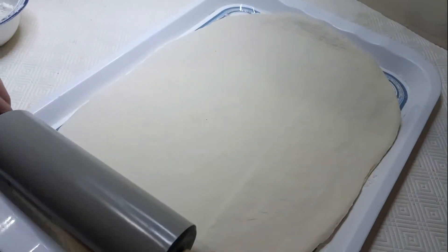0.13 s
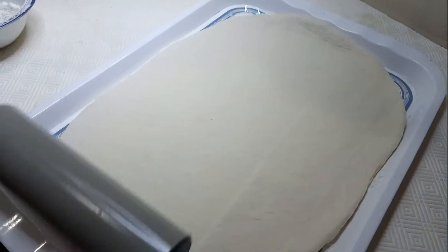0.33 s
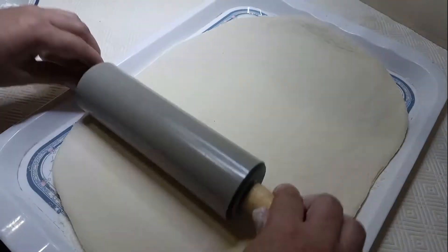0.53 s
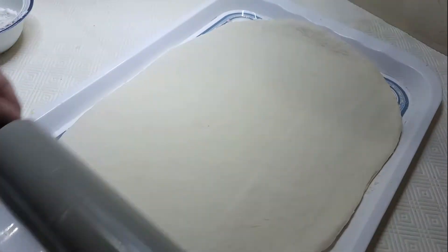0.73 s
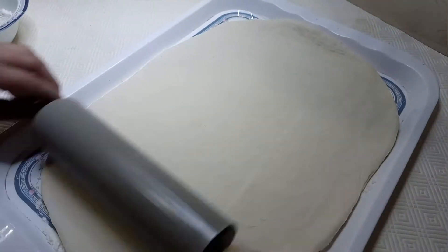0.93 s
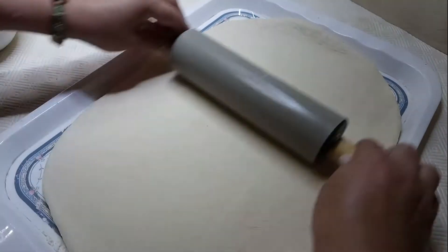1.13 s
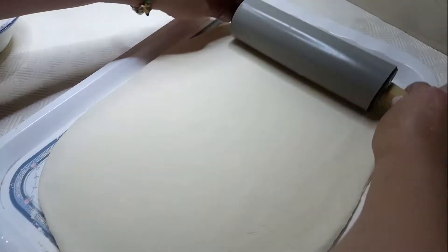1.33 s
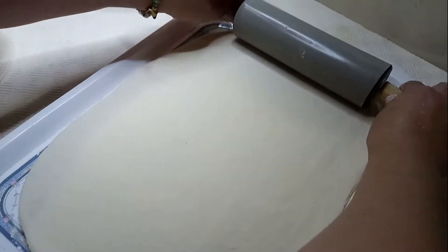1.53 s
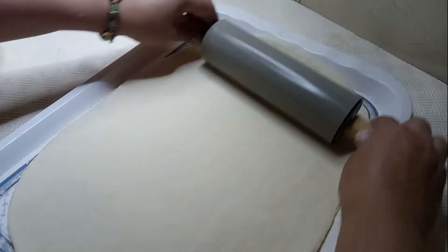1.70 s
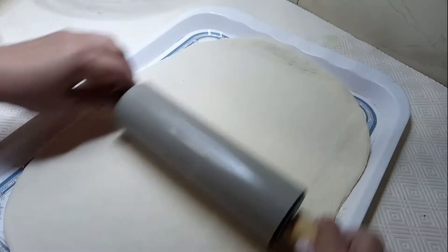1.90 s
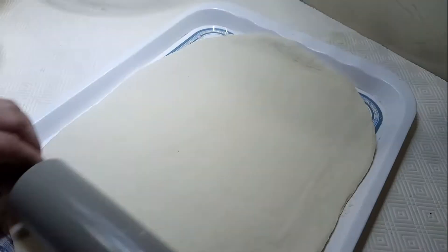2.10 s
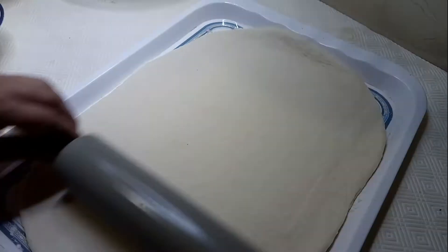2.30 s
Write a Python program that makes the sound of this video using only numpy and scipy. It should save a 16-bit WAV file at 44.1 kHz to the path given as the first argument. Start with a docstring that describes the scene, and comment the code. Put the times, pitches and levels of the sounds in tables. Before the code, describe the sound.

A rolling pin with loose wooden handles clacks several times and knocks on a plastic tray. It then rolls back and forth over dough with a soft hiss and low rumble, heard close up in a quiet kitchen.

```python
"""Rolling pin on a plastic tray

A pin with a hollow barrel and loose wooden handles rolls dough on a tray in a kitchen.
It knocks the tray as it lifts off and lands, and clacks on its axle while carried back;
each impact is a brief crack followed by the free vibration of the bodies struck.
As it rolls, axle friction gives a soft hiss, and tray and table rumble under the weight."""
import sys
import numpy as np
from scipy import signal
from scipy.fft import rfft, irfft
from scipy.io import wavfile
from scipy.ndimage import uniform_filter1d, map_coordinates

SR = 44100
rng = np.random.default_rng(int(sys.argv[2]) if len(sys.argv) > 2 else 0)


def put_to_file(sound):
    """Save the sound as 16-bit audio at rate SR, in the file named by the first command-line argument."""
    columns = np.atleast_2d(sound).T  # one column per channel
    safe = np.clip(columns, -1, 1)
    whole_steps = np.round(safe * 32767)
    wavfile.write(sys.argv[1], SR, whole_steps.astype(np.int16))


N = 103635


def amp(db):
    """Amplitude ratio of a level in decibels."""
    return 10 ** (np.asarray(db) / 20)


def unit(x):
    """Normalisation to an rms of 1."""
    return x / np.sqrt(np.mean(x ** 2) + 1e-20)


def spectrum_at(points, hz):
    """Interpolation on a logarithmic frequency axis."""
    point_hz, value = np.transpose(points)
    return np.interp(np.log(hz + 1), np.log(point_hz + 1), value)


def envelope(points):
    """Amplitude at every sample, interpolated in decibels."""
    return amp(np.interp(np.arange(N) / SR, *np.transpose(points)))


def add(mix, start_s, sound):
    """Superposition: a sound joins the mix at its start time."""
    part = mix[max(round(start_s * SR), 0):][:len(sound)]
    part += sound[:len(part)]


def colour(x, spectrum, tilt_db=0, size=8192):
    """A minimum-phase filter of unit energy imposes a spectral shape, tilted by tilt_db per octave."""
    hz = np.fft.rfftfreq(size, 1 / SR)
    octaves = np.log2(np.clip(hz, 300, 8000) / 2000)
    log_gain = np.log(amp(spectrum_at(spectrum, hz) + tilt_db * octaves) + 1e-5)
    mirrored = np.r_[log_gain, log_gain[-2:0:-1]]
    response = np.exp(np.conj(signal.hilbert(mirrored)))
    taps = np.fft.ifft(response).real[:size // 2]
    return signal.fftconvolve(x, taps / np.linalg.norm(taps))[:len(x)]


def resonate(x, hz, width_hz):
    """Forced resonance: two equal band-pass stages in series, scaled to an rms of 1."""
    b, a = signal.iirpeak(hz, hz / width_hz, SR)
    return unit(signal.lfilter(b, a, signal.lfilter(b, a, x)))


def ring(modes, t, tilt_db=0):
    """Free vibration: a sum of damped modes of alternating sign, tilted by tilt_db per octave."""
    sound = np.zeros(len(t))
    for k, (hz, db, t60_s) in enumerate(modes):
        decay = amp(db + tilt_db * np.log2(hz / 2000) - 60 * t / t60_s)
        sound += (-1) ** k * decay * np.sin(2 * np.pi * hz * t)
    return sound


def rumble():
    """Forced vibration: uneven pressure shakes the tray and keeps the table booming."""
    # Strength of the rumble: time_s, level_db
    rumble_levels = [(0, -51.5), (.055, -50), (.085, -70), (.2, -80), (.27, -53), (.315, -41.5),
                     (.4, -61.5), (.46, -46), (.53, -66), (.61, -40), (.65, -48.5), (.77, -60.5),
                     (.9, -46.5), (.94, -37.5), (.99, -52), (1.035, -40), (1.08, -52.5), (1.22, -46.5),
                     (1.31, -63.5), (1.41, -55), (1.475, -72.5), (1.52, -49.5), (1.57, -54.5),
                     (1.61, -52.5), (1.67, -58), (1.71, -46.5), (1.76, -62), (1.83, -47.5), (1.9, -62),
                     (1.955, -49), (2.01, -56), (2.05, -49), (2.13, -70), (2.185, -48.5), (2.35, -62)]
    # Spectrum of the shaking: frequency_hz, relative_db
    shake_spectrum = [(15, -39), (25, -38.5), (64, -17.5), (82, -4), (102, -8), (124, -3.5), (144, -7),
                      (195, -21.5), (230, -14.5), (255, -27.5), (288, -32), (609, -32.5), (900, -49.5),
                      (1170, -57), (1980, -120)]
    shake = unit(colour(rng.standard_normal(N), shake_spectrum))
    resonance = resonate(rng.standard_normal(N), hz=100.97, width_hz=10)
    boom = unit(np.cos(np.angle(signal.hilbert(resonance))))  # steady amplitude, wandering phase
    return envelope(rumble_levels) * (amp(-0.5) * shake + amp(4) * boom)


def still_air():
    """Ambient noise: the still room has a steady, mostly low-pitched background."""
    # Spectrum of the background: frequency_hz, relative_db
    air_spectrum = [(15, -55), (25, -11), (99, 8.5), (330, -7), (410, -17), (522, -30), (589, -9),
                    (887, -19), (1000, -18), (1270, -20.5), (1470, -19.5), (3110, -23), (7960, -28.5),
                    (10300, -47.5), (17500, -120)]
    return amp(-59) * unit(colour(rng.standard_normal(N), air_spectrum))


def crack(t, hold_s, t60_s, scatter_db):
    """Impact transient: an impulse, then dense, quickly damped vibration at a relative scatter_db."""
    decay = amp(-60 * np.maximum(t - hold_s, 0) / t60_s) * (t > 0)
    scatter = rng.standard_normal(len(t)) * decay
    for _ in range(3):  # flatten the spectrum, then restore the decay
        spectrum = rfft(scatter)
        scatter = irfft(spectrum / (abs(spectrum) + 1e-12), len(t)) * np.sqrt(decay)
    return 2 * ((t == 0) + amp(scatter_db) * scatter / np.linalg.norm(scatter))


def through_tray(x, contact_hz, stages, bend_hz=812):
    """A soft contact low-passes the blow; dispersion delays the bending waves below bend_hz."""
    pole = np.exp(-2 * np.pi * bend_hz / SR)
    x = signal.lfilter(*signal.butter(2, contact_hz, fs=SR), x)
    for _ in range(stages):
        x = signal.lfilter([-pole, 1], [1, -pole], x)  # all-pass
    return x


def thud(t, rise_s=0.0054):
    """The table's low modes build up just after a blow and decay freely."""
    # Modes of the table: pitch_hz, level_db, t60_s
    table_modes = [(73, 0, 0.2), (85.9, 4, .3), (103.2, -7, 0.59), (133.4, -2.5, 0.37), (161.2, -6, 0.17),
                   (187.3, -13, 0.56)]
    return ring(table_modes, t) * (1 - np.exp(-t / rise_s))


def knocks():
    """Impacts of the pin excite the modes of tray and table; returns cracks and ringing."""
    # Blows on the tray: start_s, crack_db, contact_hz, tray_db, thud_db, dispersion_stages
    blows = [(0.2039, -11, 6020, -33, -28.5, 17), (0.7867, -1, 9360, -24, -20.5, 10),
             (.851, -21.5, 6000, -51, -48, 11), (0.863, -13.5, 486, -49, -30.5, 11),
             (1.1326, -19.5, 2200, -46.5, -49, 3), (1.944, -33.5, 590, -58.5, -50.5, 3)]
    # Spectrum of the slap: frequency_hz, relative_db
    slap_spectrum = [(100, -10.5), (350, 11.5), (700, 7.5), (1350, 1), (1600, -1.5), (2050, 4), (2550, 0.5),
                     (2780, 0), (3020, 2.5), (3500, -4.5), (4300, 0.5), (4700, -2.5), (5100, -5),
                     (6400, -10), (7400, -12), (12000, -36.5)]
    # Modes of the plastic tray: pitch_hz, level_db, t60_s
    tray_modes = [(215, -6, .16), (357, -2, .17), (543, -2, .15), (650, -7, .09), (890, -4, .07),
                  (1118, -1, .07), (1330, 0, .07), (2060, 0, .04), (2560, 3, .025), (3020, 0, .035),
                  (4250, 1, .03), (4680, -1, .025), (5780, -3, .03)]
    cracks, rings, t = np.zeros(N), np.zeros(N), np.arange(SR) / SR
    for start_s, crack_db, contact_hz, tray_db, thud_db, stages in blows:
        slap = colour(crack(t, hold_s=0.0064, t60_s=0.026, scatter_db=3), slap_spectrum)
        add(cracks, start_s, amp(crack_db) * through_tray(slap, contact_hz, stages))
        tray = through_tray(ring(tray_modes, t), contact_hz, stages)
        add(rings, start_s, amp(tray_db) * tray + amp(thud_db) * thud(t))
    return cracks, rings


def clacks():
    """Impacts of the loose axle excite handle, barrel and table modes; returns cracks and ringing."""
    # Blows on the barrel: start_s, crack_db, tilt_db_per_octave, handle_db, barrel_db, thud_db
    blows = [(.305, -9, 2, -9.5, -42, -46.5), (.315, -12, 3.5, -17, -39.5, -50),
             (.3208, -10.5, -2.5, -26, -48.5, -55), (.4502, -16.5, 0.5, -44.5, -45.5, -74),
             (.4772, -27.5, 6, -19, -64.5, -51), (.480, -15.5, -2.5, -19.5, -49.5, -62),
             (.5539, -9.5, 0, -12.5, -27, -44), (.583, -2.5, 0.5, -41.5, -21.5, -51.5),
             (1.848, -39.5, -5, -78, -58.5, -62.5)]
    # Spectrum of the snap: frequency_hz, relative_db
    snap_spectrum = [(200, -20), (340, -17.5), (570, -10), (750, -14), (1160, -1.5), (2200, -0.5),
                     (2660, -5.5), (3360, -4.5), (3800, -7.5), (4200, -9), (5400, -10), (6200, -9.5),
                     (7400, -16.5), (8000, -24.5), (10000, -38), (15500, -48.5)]
    # Modes of the wooden handles: pitch_hz, level_db, t60_s
    handle_modes = [(2033, -4.5, 0.044), (2311, -5, 0.027)]
    # Modes of the hollow barrel: pitch_hz, level_db, t60_s
    barrel_modes = [(540, -12, .2), (1150, -6, .05), (1310, -3, .06), (1660, -4, .06), (1800, -2, .07),
                    (2325, -3, .07), (2530, -5, .04), (3070, -3, .035), (3340, 0, .04), (3892, -4, .05),
                    (4112, -1, .07), (4245, -3, .07), (4650, -3, .03), (6110, -3, .04), (6490, -9, .04),
                    (7150, -9, .035)]
    cracks, rings, t = np.zeros(N), np.zeros(N), np.arange(SR // 2) / SR
    for start_s, crack_db, tilt_db, handle_db, barrel_db, thud_db in blows:
        snap = crack(t, hold_s=0.0039, t60_s=0.045, scatter_db=3.5)
        add(cracks, start_s, amp(crack_db) * colour(snap, snap_spectrum, tilt_db))
        handles = amp(handle_db) * ring(handle_modes, t)
        barrel = amp(barrel_db) * ring(barrel_modes, t, tilt_db)
        add(rings, start_s, handles + barrel + amp(thud_db) * thud(t))
    return cracks, rings


def axle_turning(x, depth_db=3.5, patch_hz=257.3, patch_s=0.079):
    """Spectral modulation: random patches of the scrape swell and fade as the axle turns."""
    frames = dict(fs=SR, nperseg=1024, noverlap=768)
    hz, t, bands = signal.stft(x, **frames)
    grid = np.meshgrid(hz / patch_hz, t / patch_s, indexing="ij")
    patches = map_coordinates(rng.standard_normal((256, 128)), grid, order=3, mode="wrap")
    return unit(signal.istft(bands * amp(depth_db * patches), **frames)[1][:N])


def rubbing(grains_per_s=6000, start_s=0.8, fade_s=0.08):
    """Friction: tiny slips of the axle hiss, drive the pin's resonances and squeal faintly."""
    # Axle hiss, rising with rolling speed: time_s, level_db
    hiss_levels = [(0.86, -76), (0.888, -55.5), (1.132, -48.5), (1.524, -70.5), (1.586, -95.5),
                   (1.614, -63.5), (1.652, -68), (1.768, -54), (1.83, -55.5), (1.876, -50.5),
                   (2.096, -55.5), (2.138, -68), (2.182, -61), (2.216, -67.5), (2.254, -93.5), (2.308, -56),
                   (2.35, -52)]
    # Spectrum of the hiss: frequency_hz, relative_db
    hiss_spectrum = [(250, -19.5), (600, -16.5), (1000, -21), (1400, -17), (2000, -13), (2600, -6.5),
                     (3400, -7), (4100, -3.5), (4900, -4.5), (6000, 1), (6800, -7.5), (7500, -2.5),
                     (8000, -12), (10000, -31.5), (13000, -38)]
    # Resonances of the barrel: pitch_hz, width_hz, level_db
    barrel_resonances = [(543, 48, -26.5), (4030, 260, -22), (6040, 450, -10.5)]
    # Response of the handles while rolling: time_s, level_db
    handle_levels = [(.8, -90), (.95, -64), (1.25, -65), (1.45, -77), (1.6, -89), (1.72, -67.5),
                     (1.95, -58), (2.1, -66.5), (2.2, -66.5), (2.25, -83), (2.31, -61)]
    # Partials of the axle's squeal: pitch_hz, width_hz, level_db
    squeal_partials = [(2790, 89, -5), (3182, 110, 2), (6570, 150, -9.5)]
    # Squeal at the far end of the stroke: time_s, level_db
    squeal_levels = [(1.05, -90), (1.2, -66.5), (1.4, -68.5), (1.52, -75), (1.6, -76.5), (1.75, -65),
                     (1.85, -98)]
    grains = rng.standard_normal(N) * (rng.random(N) < grains_per_s / SR)
    grains *= amp(np.minimum(rng.exponential(1, N), 4))
    slips = axle_turning(rng.standard_normal(N) + amp(-8.5) * unit(grains))
    hiss = amp(1.5) * unit(colour(slips, hiss_spectrum))
    hiss += sum(amp(db) * resonate(slips, hz, width) for hz, width, db in barrel_resonances)
    chafe = rng.standard_normal(N)
    handles = resonate(chafe, hz=2034, width_hz=260)
    handles += amp(-7) * resonate(slips, hz=1700, width_hz=2000)  # broad wooden body
    squeal = sum(amp(db) * resonate(chafe, hz, width) for hz, width, db in squeal_partials)
    rolling = np.clip((np.arange(N) / SR - start_s) / fade_s, 0, 1)
    return rolling * (envelope(hiss_levels) * hiss + envelope(handle_levels) * handles
                      + envelope(squeal_levels) * squeal)


def kitchen(x, tails=3, cycle_s=0.3184, onset_s=0.002, low_cut_hz=220):
    """Reverberation: each band decays at its own rate; cyclically crossfaded tails keep it diffuse."""
    # Reverberation time of the kitchen: frequency_hz, t60_s
    decay_times = [(100, 0.55), (300, 0.41), (700, 0.49), (2000, 0.45), (5000, 0.38), (8000, 0.48)]
    x = signal.lfilter(*signal.butter(2, low_cut_hz, "high", fs=SR), x)
    reverb = np.zeros(N)
    for k in range(tails):
        hz, t, bands = signal.stft(rng.standard_normal(SR), SR, nperseg=256)
        bands /= np.sqrt(uniform_filter1d(abs(bands) ** 2, size=24, axis=1) + 1e-20)
        decay = amp(-60 * t / spectrum_at(decay_times, hz)[:, None])
        tail = signal.istft(bands * decay, SR, nperseg=256)[1]
        tail *= np.clip(np.arange(len(tail)) / SR / onset_s - 0.5, 0, 1)
        phase = np.pi * (np.arange(N) / SR / cycle_s + k / tails)
        share = np.cos(phase) ** 2 * np.sqrt(8 / 3 / tails)  # constant-power crossfade
        reverb += signal.fftconvolve(x * share, tail / np.linalg.norm(tail))[:N]
    return reverb


def microphone(x, hiss_db=-85.5):
    """Transduction: the microphone loses deep bass and the top octave and adds a steady hiss."""
    # Frequency response: frequency_hz, gain_db
    response = [(20, -16.5), (40, -3), (65, -4), (7200, -2), (7700, -7), (8400, -23.5), (11000, -9),
                (15000, -23.5)]
    hz = np.fft.rfftfreq(2 * N, 1 / SR)
    filtered = irfft(rfft(x, 2 * N) * amp(spectrum_at(response, hz)))[:N]
    return filtered + amp(hiss_db) * rng.standard_normal(N)


def scene():
    """Direct sound, reverberation and early reflections superpose at the microphone."""
    # Reflections from the table and a nearby wall: delay_s, level_db
    echoes = [(.0017, -20), (.0048, -15.5), (.0093, -33.5)]
    cracks, rings = np.add(clacks(), knocks())
    impacts = cracks + rings
    rub = rubbing()
    air = still_air()
    reverb = kitchen(cracks + amp(-2) * (rings + rub))
    sound = impacts + rub + amp(-8) * reverb + rumble() + air
    for delay_s, level_db in echoes:
        add(sound, delay_s, amp(level_db) * impacts)
    return microphone(sound)[None]


def record(dry):
    """Band limiting: a steep linear-phase low-pass removes the highest treble."""
    cutoff_hz = 15700
    taps = signal.firwin(511, cutoff_hz, window=("kaiser", 9), fs=SR)
    return signal.oaconvolve(dry, taps[None], "same")


dry = scene()
out = record(dry)
put_to_file(out)
```